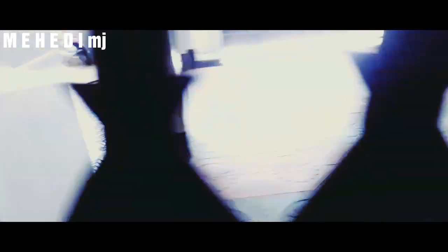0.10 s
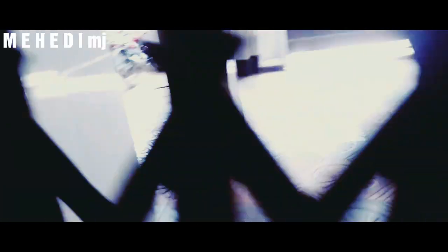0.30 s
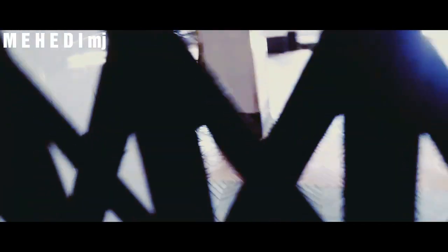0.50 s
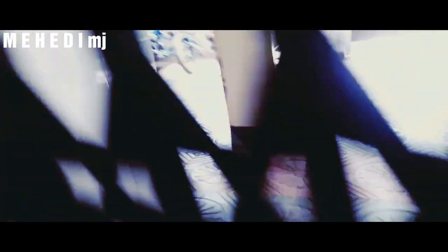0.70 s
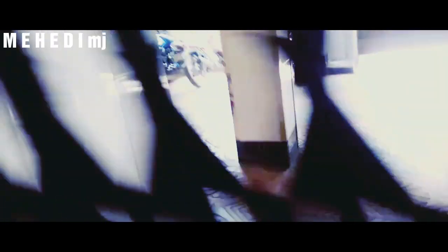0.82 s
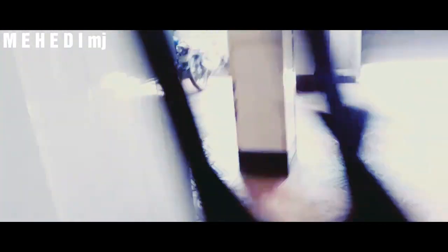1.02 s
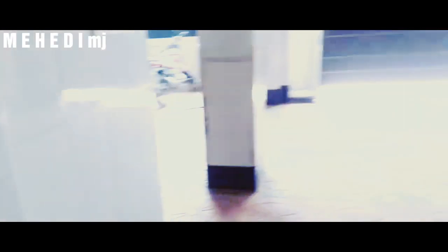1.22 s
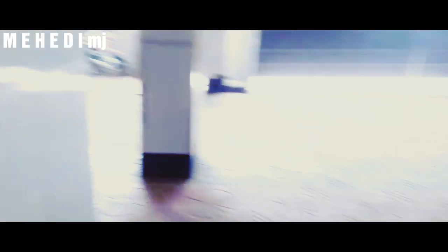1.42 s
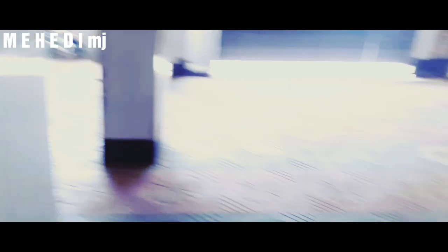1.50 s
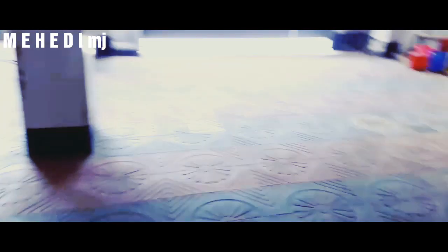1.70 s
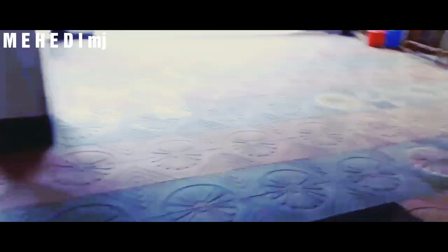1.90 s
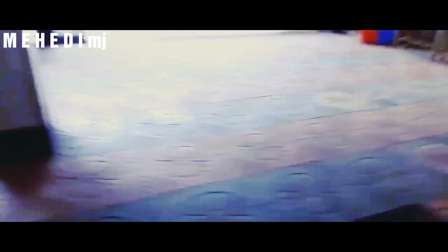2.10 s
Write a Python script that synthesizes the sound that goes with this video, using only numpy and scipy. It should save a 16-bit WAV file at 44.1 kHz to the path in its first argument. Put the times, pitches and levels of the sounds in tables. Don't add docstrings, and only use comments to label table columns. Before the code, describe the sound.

A folding steel gate is shoved open close to a phone microphone: latch clanks, rumbling rollers and rattling bars with dry squeaks, then a harsh burst of stacking clanks, echoing away in a tiled entrance hall.

```python
import sys
import numpy as np
from scipy import signal
from scipy.fft import rfft, irfft
from scipy.io import wavfile
from scipy.ndimage import uniform_filter1d

SR = 44100
rng = np.random.default_rng(int(sys.argv[2]) if len(sys.argv) > 2 else 0)


def boost_factor(decibels):
    exponent = np.asarray(decibels, float) / 20
    return 10 ** exponent


def waveform_to_disk(signal):
    frames = np.transpose(np.atleast_2d(signal))
    scaled = np.clip(frames, -1, 1) * 32767
    samples = np.round(scaled).astype(np.int16)
    wavfile.write(sys.argv[1], SR, samples)


N = 92610
T = np.arange(N) / SR


def evened(x):
    return x / np.sqrt(np.mean(x ** 2) + 1e-20)


def read(points, hz):
    point_hz, value = np.transpose(points)
    return np.interp(np.log(hz + 1), np.log(point_hz + 1), value)


def colour(x, points):
    curve_db = np.maximum(read(points, np.fft.rfftfreq(len(x), 1 / SR)), -90)
    return evened(irfft(rfft(x) * boost_factor(curve_db), len(x)))


def slow(rate_hz, size=N):
    span = max(int(SR / rate_hz), 2)
    once = uniform_filter1d(rng.standard_normal(size), span)
    return evened(uniform_filter1d(once, span))


def fuzz(width_hz, rough, size):
    wander = slow(width_hz, size=size) + 1j * slow(width_hz, size=size)
    return 1 - rough + rough * wander / np.sqrt(2)


def blurred(hz, t, width_hz, rough):
    return fuzz(width_hz, rough, size=len(t)) * np.exp(2j * np.pi * hz * t)


def layer(source, rows):
    mix = np.zeros(N)
    for row in rows:
        start_s, sound = source(*row)
        part = mix[round(start_s * SR):][:len(sound)]
        part += sound[:len(part)]
    return mix


def quiet_air():
    # (pitch_hz, level_db)
    air_tone = [(25, -32), (70, -12.5), (180, -4.5), (400, -1), (950, -6.5), (1100, -8.5), (4040, -18.5),
                (6500, -22.5), (7300, -38), (8000, -45), (15500, -46)]
    rush = boost_factor(-45.5 + 2.2 * slow(19.0)) * colour(rng.standard_normal(N), air_tone)
    whine = boost_factor(-54) * blurred(4040, T, 200, .6).real
    return rush + whine


def squeak(start_s, length_s, hz, db):
    t = np.arange(8192) / SR
    past_end = np.maximum(t - length_s, 0)
    shape = np.minimum(t / .009, 1) * boost_factor(-4 * t / length_s - 700 * past_end)
    rising = np.exp(2j * np.pi * hz * (t + .04 * t ** 2))
    tone = rising * fuzz(min(240, .14 * hz), .33, size=len(t))
    return start_s, 1.92 * boost_factor(db) * shape * tone.real


def squeaks():
    # (start_s, length_s, pitch_hz, level_db)
    pivot_rows = [(.206, .012, 3230, -38), (.216, .008, 6200, -34), (.31, .025, 6400, -30),
                  (.44, .018, 8120, -29), (.45, .035, 4250, -25), (.58, .02, 3490, -23),
                  (.607, .035, 3570, -23), (.605, .02, 2200, -26), (.672, .025, 2170, -26),
                  (1.018, .035, 4330, -21), (1.07, .03, 4350, -22), (1.12, .015, 4350, -29),
                  (1.01, .03, 8660, -40), (1.06, .055, 8680, -34), (1.147, .016, 4490, -18),
                  (1.175, .028, 4500, -21), (1.212, .03, 4520, -21), (1.255, .022, 4530, -23),
                  (1.27, .1, 7320, -31), (1.23, .012, 3400, -25), (1.466, .008, 8400, -26),
                  (1.45, .02, 3860, -24), (1.473, .045, 3860, -21), (1.53, .07, 3850, -25),
                  (1.688, .085, 3335, -28), (1.72, .1, 6700, -43), (1.71, .07, 3850, -34),
                  (1.92, .1, 3870, -38), (2.04, .05, 3870, -41), (1.91, .05, 15150, -69)]
    # (start_s, length_s, pitch_hz, level_db)
    moan_rows = [(.465, .012, 8130, -30), (.484, .018, 8130, -27), (.508, .014, 8130, -29),
                 (.527, .01, 8130, -33), (.55, .06, 8130, -42), (.365, .05, 2865, -19),
                 (.352, .04, 3170, -21), (.35, .014, 6140, -23), (.39, .012, 6350, -28),
                 (.58, .1, 318, -31), (.69, .13, 325, -30), (.9, .12, 262, -28), (.85, .045, 1010, -28),
                 (.965, .04, 1050, -25), (1.035, .03, 1040, -28), (1.64, .025, 3870, -32),
                 (1.71, .09, 3470, -38), (1.84, .03, 3470, -41), (1.82, .04, 3110, -40),
                 (1.79, .02, 3360, -36), (2.03, .05, 3620, -45)]
    return layer(squeak, pivot_rows) + layer(squeak, moan_rows)


def pushed(column):
    # (time_s, roller_rumble_db, bar_rattle_db)
    push_rows = np.array([(0.217, -42, -36), (.33, -40, -32), (0.358, -27, -26), (.5, -27.5, -22.5),
                          (.65, -25.5, -21), (.95, -21, -19.5), (1.15, -23, -20), (1.3, -24, -19.5),
                          (1.42, -28.5, -11.5), (1.551, -33, -14), (1.698, -47.5, -30), (2.1, -48.5, -50)])
    return boost_factor(np.interp(T, push_rows[:, 0], push_rows[:, column], left=-90))


def struck(low_hz, high_hz, per_s, spread_db, t60, count):
    happens = rng.random(N) < per_s / SR
    force = happens * boost_factor(spread_db * np.minimum(rng.exponential(1, N), 4))
    bar = rng.integers(0, count, N)
    t = np.arange(4000) / SR
    out = np.zeros(N)
    for k, (pitch_luck, fade_luck) in enumerate(rng.random((count, 2))):
        hz = low_hz * (high_hz / low_hz) ** ((k + pitch_luck) / count)
        ring = boost_factor(-60 * t / (t60 * (0.19 + fade_luck))) * np.sin(2 * np.pi * hz * t)
        ring = ring / np.linalg.norm(ring)
        out += signal.oaconvolve(force * (bar == k), ring)[:N] * np.sqrt(hz)
    return evened(out)


def rollers():
    # (pitch_hz, level_db)
    track_tone = [(30, -42), (60, -37), (130, -11), (200, -3), (310, -1), (480, -2), (1030, 0.5),
                  (1500, -2), (2200, -4.5), (3200, -19), (5000, -38)]
    bumps = struck(60.8, 2965, per_s=2500, spread_db=2.5, t60=0.084, count=40)
    grind = boost_factor(5.0) * rng.standard_normal(N) + bumps
    return pushed(1) * boost_factor(1.4 * slow(41)) * colour(grind, track_tone)


def rattle():
    # (pitch_hz, level_db)
    bar_tone = [(500, -65), (800, -15), (1500, -4.5), (2150, 0.5), (3000, -6), (3900, -3.5), (6500, -16),
                (9000, -26.5), (15500, -35.5)]
    taps = struck(692.8, 15500, per_s=4000, spread_db=3.5, t60=0.062, count=60)
    chatter = boost_factor(5.0) * rng.standard_normal(N) + taps
    return pushed(2) * boost_factor(2.0 * slow(33.6)) * colour(chatter, bar_tone)


def clank(modes, start_s, ring_db, crack_db, splash_db, t60):
    # (pitch_hz, level_db)
    crack_tone = [(200, -50), (450, -21), (1000, -11), (1500, -14), (2150, -0.5), (2600, -4.5),
                  (4500, -6.5), (6200, -9), (9000, -40), (12000, -53)]
    # (pitch_hz, level_db)
    splash_tone = [(2350, -45), (4000, 1), (6660, 1), (8120, -11), (9570, -8), (12600, -12.5), (15500, -19)]
    t = np.arange(8192) / SR
    tones = sum(boost_factor(db) * blurred(hz, t, 215, 0.55) for hz, db in modes).real
    ring = boost_factor(ring_db - 60 * t / (1.18 * t60)) * np.minimum(t / 0.0074, 1) * tones
    fade = boost_factor(-60 * t / t60) + .7 * boost_factor(-60 * t / .02)
    noise = colour(rng.standard_normal(len(t)), crack_tone)
    crack = boost_factor(crack_db) * np.minimum(t / .0008, 1) * fade * noise
    spray = colour(rng.standard_normal(len(t)), splash_tone)
    splash = boost_factor(splash_db - 60 * t / 0.16) * np.minimum(t / 0.00087, 1) * spray
    return start_s, ring + crack + splash


def clanks():
    # (pitch_hz, level_db)
    latch_modes = [(2100, -14), (2568, -14), (2869, -7.5), (3160, 2), (3400, -4), (3600, 0.5), (4230, -10),
                   (5330, -6), (6142, -1), (6342, -8)]
    # (pitch_hz, level_db)
    stack_modes = [(700, -11.5), (1044, -2), (1900, 1), (2200, -1), (2600, -8.5), (3100, -16), (4450, -2),
                   (6000, -23)]
    # (start_s, ring_db, crack_db, splash_db, fade_60db_s)
    latch_rows = [(0.2188, -32, -33.5, -42, 0.31), (0.235, -29, -19.5, -36, 0.24),
                  (.256, -40, -39, -50, 0.13), (.309, -23, -26, -39, 0.098), (.340, -21, -23.5, -28, 0.24),
                  (.351, -17, -16.5, -21.5, 0.13), (.388, -20, -20.5, -26.5, 0.22),
                  (.446, -35, -20, -26, 0.12), (.4526, -24, -17, -26, 0.071),
                  (0.484, -39, -26, -26.5, 0.078)]
    # (start_s, ring_db, crack_db, splash_db, fade_60db_s)
    stack_rows = [(1.0669, -29, -25, -38, 0.068), (1.154, -20, -23, -32, 0.098),
                  (1.175, -31, -32, -23.5, 0.058), (1.305, -37, -19.5, -19.5, 0.073),
                  (1.3295, -17, -18.5, -15, 0.11), (1.344, -22, -14, -34, 0.15),
                  (1.365, -19, -13.5, -40, 0.099), (1.392, -27, -24, -49, 0.029),
                  (1.425, -22, -25, -49, 0.066)]
    latch = layer(lambda *row: clank(latch_modes, *row), latch_rows)
    stack = layer(lambda *row: clank(stack_modes, *row), stack_rows)
    return latch + stack


def knock(start_s, db, hz, t60):
    t = np.arange(4096) / SR
    return start_s, boost_factor(db - 60 * t / t60) * np.minimum(t / 0.0018, 1) * np.sin(2 * np.pi * hz * t)


def knocks():
    # (start_s, level_db, pitch_hz, fade_60db_s)
    knock_rows = [(.235, -17.5, 4800, 0.038), (.445, -9.5, 2200, 0.037), (.353, -10, 3700, 0.035),
                  (0.34, -15, 4200, .05), (0.35, -6.5, 3000, 0.046), (0.38, -12, 3700, 0.044),
                  (0.32, -19, 3100, 0.036), (0.43, -14, 2820, 0.059), (0.43, -19, 6900, .03),
                  (0.33, -18, 1900, 0.049), (.49, -21, 2200, 0.026), (1.292, -16, 2180, 0.11),
                  (1.304, -13.5, 2080, .04), (1.305, -13, 5260, .03), (1.332, -10.5, 2400, 0.046),
                  (1.333, -15, 6300, .03), (1.344, -8.5, 2670, 0.047), (1.344, -8, 3100, 0.04),
                  (1.346, -17, 1060, 0.061), (1.364, -13, 1000, 0.048), (1.365, -19, 724, 0.038),
                  (1.7, -19, 2000, 0.048), (1.556, -17, 2200, .06), (1.53, -15, 2000, 0.039),
                  (1.365, -20, 2100, 0.044), (1.377, -7.5, 1800, 0.033), (1.391, -14, 1910, 0.031),
                  (1.419, -14.5, 2250, 0.041), (1.427, -17, 2400, 0.048), (1.443, -22, 2020, 0.036),
                  (1.474, -11, 4400, 0.072), (1.467, -27, 1800, .04)]
    return layer(knock, knock_rows)


def screech(start_s, length_s, hz, width_hz, db):
    t = np.arange(SR // 2) / SR
    past_end = np.maximum(t - length_s, 0)
    shape = np.minimum(t / 0.015, 1) * boost_factor(-6 * t / length_s - 57 * past_end)
    return start_s, boost_factor(db) * shape * blurred(hz, t, width_hz, 0.73).real


def screeches():
    # (start_s, length_s, centre_hz, width_hz, level_db)
    screech_rows = [
        (0.346, 0.051, 3152, 910, -15),
        (1.346, 0.3, 2040, 1240, -20.5),
    ]
    return layer(screech, screech_rows)


def tick(start_s, db, hz, other_hz, t60):
    t = np.arange(6000) / SR
    sharp = np.diff(rng.standard_normal(len(t) + 5), 5)[:len(t)] / 16
    click = boost_factor(3 - 60 * t / .02) * sharp
    ring = (blurred(hz, t, 500, 0.45) + blurred(other_hz, t, 500, 0.45)).real
    return start_s, boost_factor(db) * np.minimum(t / 0.00085, 1) * (boost_factor(-60 * t / t60) * ring + click)


def ticks():
    # (start_s, level_db, first_pitch_hz, second_pitch_hz, fade_60db_s)
    tick_rows = [(.475, -36, 13650, 13200, 0.17), (.48, -36, 14850, 14400, .15),
                 (.8966, -42, 13800, 15000, 0.086), (1.053, -37, 13900, 13300, .06),
                 (1.128, -41, 13600, 13900, 0.063), (1.679, -74, 16300, 11600, 0.11),
                 (1.681, -38, 13600, 15200, .04), (1.977, -54, 13100, 14900, .08),
                 (1.989, -45, 14000, 12400, 0.036)]
    return layer(tick, tick_rows)


def thump(start_s, db, hz, t60):
    t = np.arange(SR // 2) / SR
    return start_s, boost_factor(db - 60 * t / t60) * np.minimum(t / 0.011, 1) * np.sin(2 * np.pi * hz * t)


def thumps():
    # (start_s, level_db, pitch_hz, fade_60db_s)
    thump_rows = [
        (1.152, -25, 112, 0.19),
        (1.24, -37, 55, 0.32),
        (1.33, -33.5, 71, 0.14),
    ]
    return layer(thump, thump_rows)


def hall(x):
    # (pitch_hz, fade_60db_s)
    hall_fade = [(150, 3.57), (1000, 1.43), (2500, 1.62), (5000, 1.35), (9000, 0.94), (15000, 0.2)]
    echoes = rng.standard_normal(2 * SR) * (np.arange(2 * SR) > 300)
    hz, t, bands = signal.stft(echoes, SR, nperseg=256)
    fading = bands * boost_factor(-60 * t / read(hall_fade, hz)[:, None])
    tail = signal.istft(fading, SR, nperseg=256)[1]
    return signal.fftconvolve(x, tail / np.linalg.norm(tail))[:N]


def scene():
    air = quiet_air()
    whistles = squeaks()
    slide = boost_factor(-2) * rollers() + boost_factor(-5) * rattle()
    hits = clanks() + knocks() + screeches()
    near = ticks() + thumps()
    to_hall = boost_factor(-6.5) * hits + boost_factor(-11.5) * whistles + boost_factor(-18) * near + boost_factor(-6.5) * slide
    mono = hits + whistles + near + slide + hall(to_hall) + air
    return mono * boost_factor([[.015], [-.015]])


def band_limit(x):
    return signal.sosfilt(signal.butter(12, 16620, fs=SR, output="sos"), x)


def record(dry):
    # (pitch_hz, level_db)
    mic_tone = [(20, -6), (90, 0.5), (200, -2), (7200, -0.5), (7800, -5.5), (8800, -0.5), (16000, 2.5)]
    mic = irfft(rfft(dry) * boost_factor(read(mic_tone, np.fft.rfftfreq(N, 1 / SR))), N)
    overloaded = 1.153 * np.tanh(mic / 1.041)
    treble_limit = signal.firwin(511, 15700, window=("kaiser", 9), fs=SR)
    return band_limit(signal.oaconvolve(overloaded, treble_limit[None], "same"))


dry = scene()
out = record(dry)
waveform_to_disk(out)
```